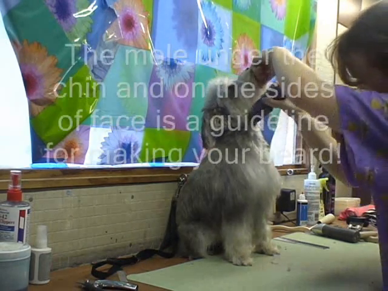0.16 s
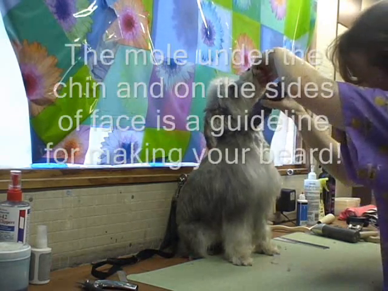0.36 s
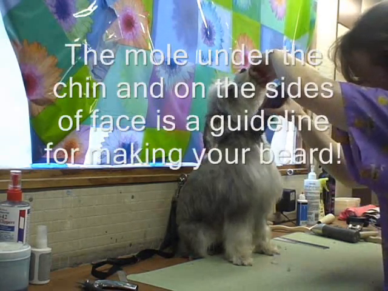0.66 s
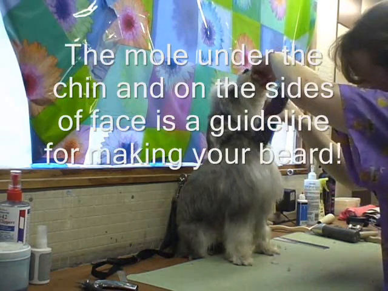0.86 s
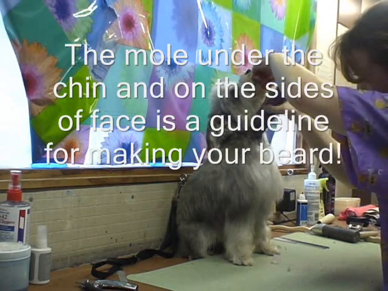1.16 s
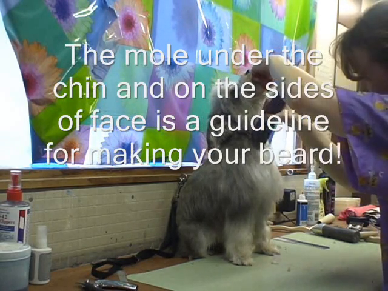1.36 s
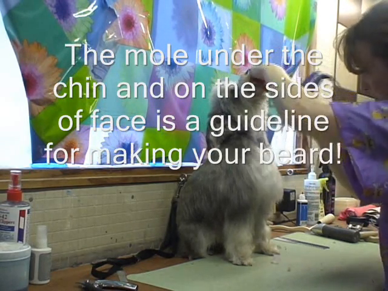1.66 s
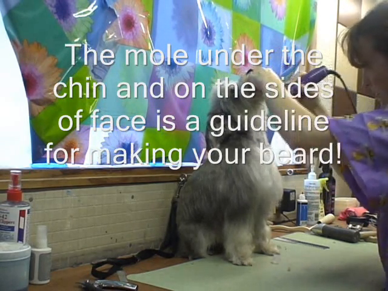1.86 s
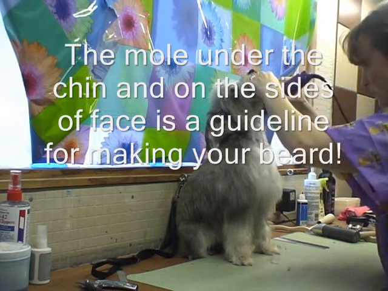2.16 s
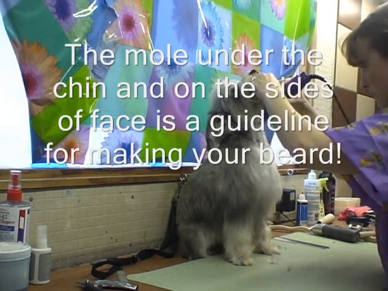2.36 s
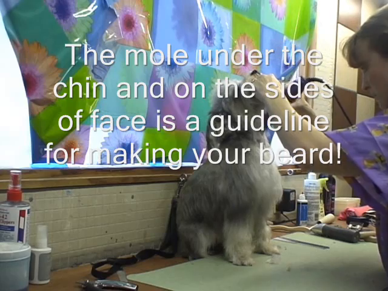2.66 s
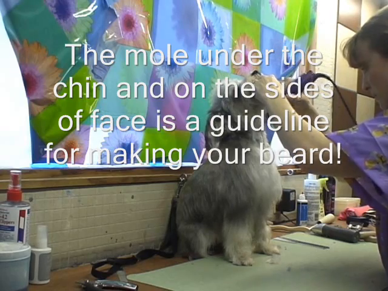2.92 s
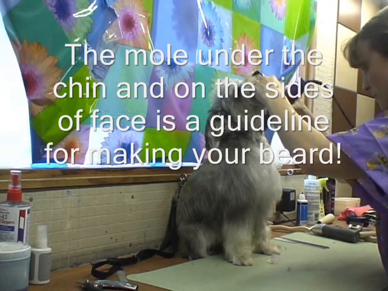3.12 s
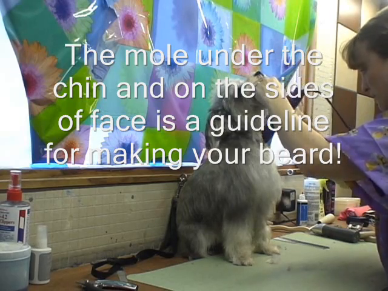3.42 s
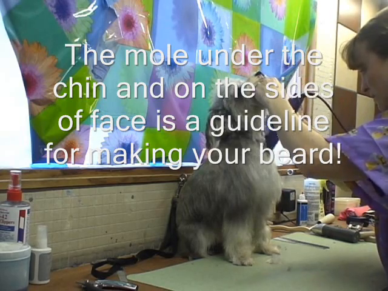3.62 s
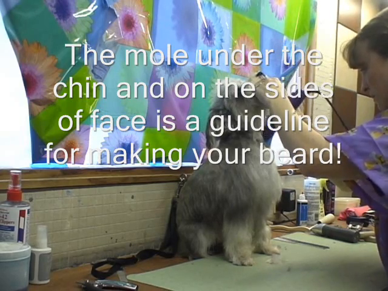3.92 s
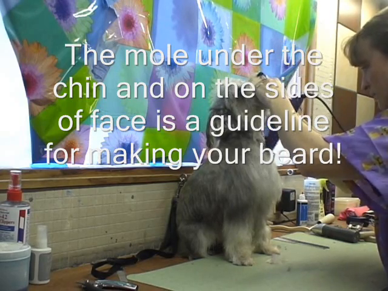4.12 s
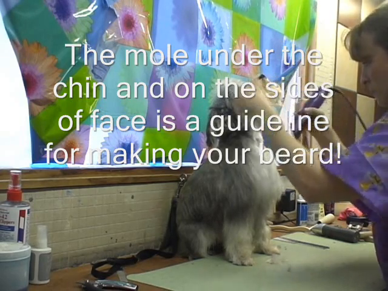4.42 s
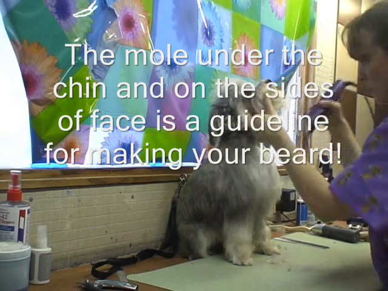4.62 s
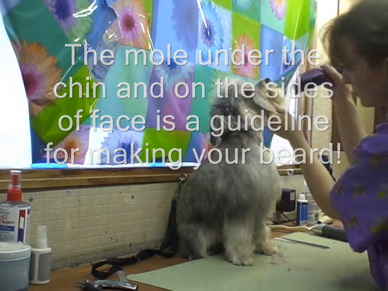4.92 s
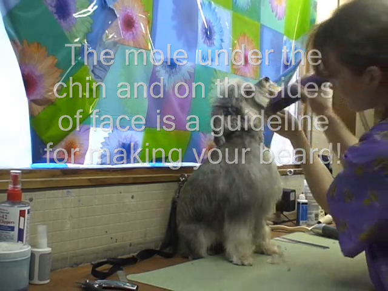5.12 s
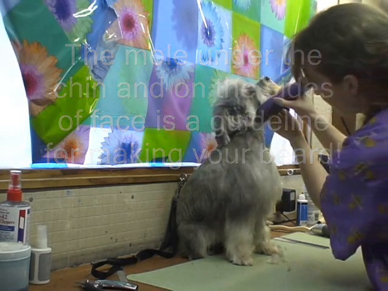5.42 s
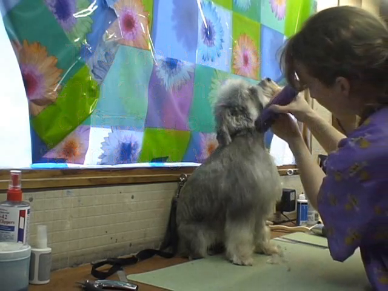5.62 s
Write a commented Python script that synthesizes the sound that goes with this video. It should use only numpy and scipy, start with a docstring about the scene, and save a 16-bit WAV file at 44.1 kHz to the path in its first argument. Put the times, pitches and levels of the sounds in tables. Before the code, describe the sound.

Electric clippers run without a break at a grooming table in a small room, trimming a dog's face. The motor buzz holds one pitch, with a bright hiss from the teeth and a light metallic blade rattle. The tone shifts as the tool turns, growing rougher when pressed into the fur past the middle. The clippers sit to the right of the microphone, over a faint room rumble.

```python
"""Electric clippers on a dog's face

Clippers work at a grooming table in a small room, a little to the right. The motor throws the blade
to and fro about 75 times a second; housing and blade ring at multiples of that rate, and their colour
shifts as the hand turns the tool. The teeth hiss, the blade rattles, low drones come and go,
the room rumbles faintly."""
import sys
import numpy as np
from scipy import signal
from scipy.fft import irfft, next_fast_len
from scipy.io import wavfile
from scipy.ndimage import uniform_filter1d, map_coordinates

SR = 44100
rng = np.random.default_rng(int(sys.argv[2]) if len(sys.argv) > 2 else 0)


def output_pcm(signal):
    """Save a mono or channel-first signal as 16-bit PCM at the path in sys.argv[1].

    Samples are clipped to [-1, 1] before scaling.
    """
    pcm = np.clip(np.atleast_2d(signal).T, -1, 1) * 32767
    wavfile.write(sys.argv[1], SR, np.round(pcm).astype(np.int16))


N = 254898

# motor speed, sagging under load (time [s], stroke rate [Hz])
MOTOR_SPEED = [(0.0, 75.5), (0.92, 75.5), (1.11, 75.2), (1.53, 75.4), (1.66, 75.2), (2.0, 75.5),
               (4.06, 75.6), (4.25, 75.7), (5.62, 75.6), (5.78, 75.3)]
# lower buzz lines (harmonic number, relative level [dB])
LOW_LINES = [(1, -28.5), (2, -30.5), (3, -23.5), (4, -34.5), (5, -19), (6, -19.5), (7, -16), (8, -15),
             (9, -16.5), (10, -10), (11, -17), (12, -9), (13, -16), (14, -11.5), (15, -12), (16, -13),
             (17, -13), (18, -5), (19, -10.5), (20, -5.5), (21, -11), (22, -8), (23, -5), (24, -11.5),
             (25, -2), (26, -4), (27, 6), (28, 2), (29, -3.5), (30, -6.5), (31, -5), (32, -8), (33, -14),
             (34, -8.5), (35, -7.5), (36, -17.5)]
# upper buzz lines (frequency [Hz], relative level [dB])
HIGH_LINES = [(2750, -9.5), (3200, -14.5), (4300, -14), (5500, -18), (7000, -20), (9000, -19.5)]
# bands of housing, front cap, blade, blade guide, teeth (lower edge [Hz])
BAND_EDGES_HZ = [1020, 1170, 1930, 2300, 3400]
# steel comb resonances (frequency [Hz], width [Hz], lift [dB])
COMB_RINGS = [(3320, 40, 3), (3625, 50, 2.5), (3850, 30, 3), (4002, 30, 5.5), (4230, 40, 2.5),
              (4455, 40, 3), (4530, 30, 2), (5060, 40, 3)]
# holds of the tool, each until the next (name, start [s], travel [standing-wave patterns/s],
# jaw pressure [0-1], blade chatter [factor], cap level [dB], guide level [dB], teeth level [dB])
TOOL_HOLDS = [("first cut", 0.0, 1.866, 0.59, 1.3, -32.5, -38.5, -34.5),
              ("deeper cut", 0.91, 1.914, 0.32, 1.1, -31.5, -37, -34),
              ("turning", 1.734, 3.58, 0.079, 1.8, -34, -37.5, -35),
              ("second cut", 2.093, 1.2, 0.53, 1.3, -35, -37, -35.5),
              ("pressing", 3.25, 1.58, 1, 2.9, -39.5, -37.5, -37.5),
              ("biting", 3.68, 2.1, 0.99, 3.3, -38, -35.5, -35),
              ("sliding", 3.98, 1.77, 1, 4.4, -39.5, -36, -35.5),
              ("lifted", 4.44, 3.3, .05, 0.98, -38, -38.5, -34),
              ("returning", 4.9, 2.46, .02, 2.8, -33.5, -35, -33.8),
              ("last cut", 5.27, 2.43, 0.063, 1.6, -32.5, -36, -34)]
# housing and comb resonances a hold frees or damps (hold name, frequency [Hz], unscaled lift [dB])
HOLD_RINGS = [("first cut", 680, 4), ("first cut", 830, -7), ("first cut", 906, 4), ("first cut", 1283, 4),
              ("first cut", 1700, 4), ("first cut", 2250, -4), ("first cut", 2600, -6),
              ("first cut", 3030, -6), ("first cut", 4455, 3), ("deeper cut", 455, 3),
              ("deeper cut", 755, 2), ("deeper cut", 906, 3), ("deeper cut", 1310, 4),
              ("deeper cut", 1700, 4), ("deeper cut", 1800, 4), ("deeper cut", 2600, -4),
              ("deeper cut", 2945, 4), ("turning", 528, 3), ("turning", 680, -6), ("turning", 1330, 4),
              ("turning", 1812, 4), ("turning", 2038, -5), ("turning", 3020, 5), ("second cut", 906, -2),
              ("second cut", 1480, 5.5), ("second cut", 1888, 2), ("second cut", 1963, -6),
              ("second cut", 2590, 6), ("second cut", 3020, 5), ("second cut", 3930, 4),
              ("pressing", 1490, 5), ("pressing", 2038, -5), ("pressing", 2645, 3), ("pressing", 4000, -4),
              ("biting", 830, 4), ("biting", 1490, 5), ("biting", 2038, -3), ("biting", 2340, 2),
              ("biting", 4000, -3), ("sliding", 790, 5), ("sliding", 1510, 3), ("sliding", 1888, -4),
              ("sliding", 2038, -5), ("sliding", 2190, 3), ("lifted", 604, 7), ("lifted", 680, -6),
              ("lifted", 830, 4), ("lifted", 1510, -3), ("lifted", 2340, -5), ("returning", 604, 7),
              ("returning", 680, -6), ("returning", 1359, 5), ("returning", 1888, 5),
              ("returning", 2114, -5), ("last cut", 830, 3), ("last cut", 1620, 3), ("last cut", 1888, 3),
              ("last cut", 2038, -4), ("last cut", 2190, 2), ("last cut", 2416, 4)]
# housing ring, tuned and damped by the fingers (time [s], level [dB], frequency [Hz])
HOUSING_RING = [(0, -42.5, 1095), (.25, -52, 1110), (.9, -47, 1085), (1.25, -51, 1090), (1.65, -47.5, 1072),
                (1.85, -39.3, 1090), (2.02, -39.6, 1103), (2.35, -44.8, 1095), (3.1, -45, 1098),
                (3.35, -41.5, 1078), (3.85, -41, 1057), (4.42, -39, 1060), (4.6, -39.5, 1116),
                (4.85, -38, 1115), (5.06, -35.5, 1093), (5.2, -37, 1100), (5.38, -38.2, 1132),
                (5.78, -39.3, 1128)]
# blade ring, swelling as the hand works (time [s], level [dB])
BLADE_RING_DB = [(0.0, -32.5), (0.3, -31), (0.42, -27.7), (0.54, -30.0), (0.58, -26.5), (0.8, -29),
                 (0.88, -28.5), (0.94, -31.5), (1.14, -30.5), (1.24, -28.5), (1.62, -32), (1.64, -33.8),
                 (1.82, -30), (1.98, -36), (2.2, -31.5), (2.33, -35), (2.87, -34), (3.05, -32.5),
                 (3.25, -34.5), (3.29, -35.5), (3.65, -35), (3.73, -31.5), (3.93, -30), (4.03, -34),
                 (4.27, -33.5), (4.31, -37), (4.37, -31), (4.81, -29), (4.85, -31), (4.97, -33),
                 (5.05, -36), (5.07, -32.3), (5.15, -38), (5.29, -32.5), (5.47, -35), (5.78, -33)]
# blade ring, rising as the comb pushes into fur (time [s], frequency [Hz])
BLADE_RING_HZ = [(0, 2013), (.55, 2045), (.82, 1996), (1.25, 2029), (1.8, 1972), (2.0, 2106), (2.22, 2019),
                 (3.1, 2010), (3.48, 2191), (3.72, 2092), (3.95, 2087), (4.1, 2210), (4.35, 2166),
                 (4.6, 2035), (5.0, 2013), (5.2, 2210), (5.45, 2065), (5.7, 2037)]
# partials flashing as comb or housing passes the mic (peak [s], length [s], frequency [Hz], level [dB])
LINE_FLARES = [(.06, .2, 2416, -39), (.27, .1, 5060, -44), (.5, .3, 4002, -44.5), (.95, .24, 4455, -40),
               (1.05, .13, 2340, -40), (1.2, .22, 1359, -39), (1.22, .12, 3625, -43), (1.28, .3, 4002, -41),
               (1.58, .16, 4380, -41), (1.62, .14, 4910, -44), (1.77, .16, 1888, -32.5),
               (1.85, .11, 4304, -38), (2.15, .2, 4002, -40.5), (2.26, .16, 3850, -40.5),
               (2.7, .2, 4455, -42.5), (2.72, .24, 4002, -40.5), (3.2, .25, 4002, -43),
               (3.3, .14, 4530, -44), (3.74, .1, 2114, -33), (3.58, .14, 5060, -41.5),
               (3.68, .3, 755, -43.5), (3.7, .07, 5060, -39), (3.85, .25, 906, -43), (4.02, .08, 2720, -41),
               (4.1, .12, 2190, -35.5), (4.12, .09, 5060, -39.5), (4.5, .1, 4002, -42),
               (4.68, .12, 4230, -39.5), (4.9, .14, 2645, -40), (4.97, .1, 2038, -31.5),
               (5.22, .13, 2645, -36.5), (5.44, .08, 3625, -41), (5.56, .42, 906, -39.5),
               (5.68, .1, 4002, -42), (5.73, .12, 2038, -31)]
# sliding teeth (frequency [Hz], relative density [dB])
HISS_SPECTRUM = [(100, -38), (330, -7), (600, -9), (1100, -1), (1600, -0.1), (2600, 0.9), (4200, 3),
                 (5500, 3.5), (7000, -2), (10000, -0.5), (12500, 1.5), (15700, -2)]
# dull low drones (peak [s], length [s], frequency [Hz], level [dB])
LOW_DRONES = [(3.27, 0.25, 240, -48), (3.683, .27, 232, -52), (4.113, .11, 225, -47),
              (4.33, 0.13, 230, -50), (5.45, 0.67, 135, -55)]
# room rumble (frequency [Hz], relative density [dB])
RUMBLE_SPECTRUM = [(20, -25), (35, -2), (60, -6.5), (95, 0.5), (140, -4), (190, -5), (300, -6), (600, -6),
                   (2000, -77)]
# stereo balance (frequency [Hz], left minus right [dB])
MIC_BALANCE_DB = [(60, -12), (210, -13), (500, -7), (1170, -10), (1790, -6), (2740, -8.5), (4190, -7.5),
                  (6410, -4), (9810, -1.5), (15000, 0)]
# left-right likeness (frequency [Hz], coherence [0-1])
MIC_COHERENCE = [(60, 0.57), (250, 0.42), (600, 0.87), (2000, 0.57), (4000, 0.43), (9000, 0.36),
                 (15000, 0.16)]
# lead of the left mic (frequency [Hz], phase [rad])
MIC_LEAD_RAD = [(60, .1), (340, 0.78), (1200, 1), (5000, 0.8), (12000, 0.91)]

HUM_GAIN_DB, LINES_TOP_HZ = -36.5, 10000
TURN_S, TURN_SWELL_S, TURN_DB = .076, .3, .5  # change of hold
GRIP_DB, GRIP_S = 1.7, .13  # fingers shift on the housing
FUR_DB, FUR_S = 1.0, .09  # fur feeds unevenly through the teeth


def buzz(strokes, t, size=4096):
    """Motor-driven blade: one wave per stroke, each blending into the next."""
    stroke_t = np.interp(np.arange(int(strokes[-1]) + 1), strokes, t)
    lines = np.pad(stroke_lines(stroke_t), ((0, 0), (0, 0), (1, 0)))  # empty DC bin
    waves = irfft(lines, size) * size / np.sqrt(2)
    waves = np.concatenate([waves, waves[:, :, :1]], axis=2)
    position = [strokes, strokes % 1 * size]
    return np.array([map_coordinates(wave, position, order=1, mode="nearest") for wave in waves])


def stroke_lines(t, count=190, knock_db=.6, jitter_s=7e-6):
    """Complex harmonics of the stroke rate: channels x strokes x lines."""
    order = np.arange(1, count + 1)
    hz = order * np.mean(np.array(MOTOR_SPEED)[:, 1])
    part = np.searchsorted(BAND_EDGES_HZ, hz)  # 0 motor hum, 1 housing ... 5 teeth
    pace, _, chatter, *_ = hand(t)
    travel = np.cumsum(pace * np.gradient(t))
    low_db = np.interp(order, *np.transpose(LOW_LINES))
    db = np.where(order <= len(LOW_LINES), low_db, at_hz(HIGH_LINES, hz))
    db += sum(lift_db * bell(hz, ring_hz, width_hz) for ring_hz, width_hz, lift_db in COMB_RINGS)
    db -= 10 * np.log10(1 + (hz / LINES_TOP_HZ) ** 8)
    db = db + hold_colour_db(t, hz, part) + treble_beam_db(travel, hz)
    lines = from_db(db) * fading(travel, chatter, hz) * line_phases(hz)
    lines = flares(radiating_parts(lines, t, part), t, hz)
    # the loose blade lands harder or softer, earlier or later, each stroke
    force, late = rng.standard_normal((2, len(t), 1))
    lines *= from_db(knock_db * force * (part > 1))
    lines *= np.exp(-2j * np.pi * hz * jitter_s * late)
    return stereo_lines(lines, travel, hz)


def hold_colour_db(t, hz, part, press_db=7, ring_scale=1.26):
    """Jaw pressure fills the low mids; blade and housing rings slide; holds free or damp resonances."""
    _, pressure, *_ = hand(t)
    db = press_db * (pressure[:, None] - .4) * bell(hz, 360, 90)
    blade = bell(hz, in_time(BLADE_RING_HZ, t)[0][:, None], 150)
    db += 8 * (blade - blade.mean(axis=0))
    housing = bell(hz, in_time(HOUSING_RING, t)[1][:, None], 60)
    db += 10 * np.log10(housing) * (part == 1)
    held = {hold[0]: share - share.mean() for hold, share in zip(TOOL_HOLDS, hold_shares(t))}
    for name, ring_hz, lift_db in HOLD_RINGS:
        db += ring_scale * lift_db * held[name][:, None] * bell(hz, ring_hz, 30 + .024 * ring_hz)
    return db


def treble_beam_db(travel, hz, swing_db=1.9):
    """Uneven treble beam: neighbouring lines swell together as the tool turns."""
    lobes = rms_one(uniform_filter1d(standing_waves(3.5 * travel, len(hz)).real, size=3, axis=1))
    return swing_db * lobes * (hz > BAND_EDGES_HZ[-1]) * bell(hz, 4400, 2200)


def fading(travel, chatter, hz, flutter=.19, rough=.06):
    """Hand tremor, stroke scatter and wall echoes vary each line, short waves most."""
    shape = len(travel), len(hz)
    tremor = rms_one(signal.fftconvolve(phasors(*shape), np.hanning(15)[:, None], "same"))
    looseness = 1 + (chatter[:, None] - 1) * bell(hz, 2000, 300)
    unsteady = looseness * np.clip(hz / 2000, .55, 1.3) * (flutter * tremor + rough * phasors(*shape))
    slow, fast = standing_waves(travel, len(hz)), standing_waves(3 * travel, len(hz))
    echoes = np.where(hz < BAND_EDGES_HZ[-1], slow, fast)
    echo_gain = np.interp(hz, [900, 3800], [.26, .68])
    return (1 + echo_gain * echoes + unsteady) / np.hypot(1, echo_gain)


def line_phases(hz, focus=.66):
    """The room scatters phase, least near the blade ring: one burst a stroke, after the cap's knock."""
    scatter_rad = np.pi * (1 - focus * bell(hz, 1990, 720) ** 2)
    lag_rad = 2 * np.arctan(2 * (hz - 2030) / 300)
    return np.exp(1j * (scatter_rad * rng.uniform(-.74, 1, len(hz)) - lag_rad))


def radiating_parts(lines, t, part, trims_db=(0, -.1, -.5, -.3, -.3)):
    """Each part radiates as the grip allows; the motor hum below stays free."""
    *_, cap_db, guide_db, _ = hand(t)
    housing_db = in_time(HOUSING_RING, t)[0] + GRIP_DB * wander(t, GRIP_S)
    cap_db = cap_db + FUR_DB * wander(t, FUR_S)
    blade_db, = in_time(BLADE_RING_DB, t)
    guide_db = guide_db + FUR_DB * wander(t, FUR_S)
    teeth_db = teeth_level_db(t) + FUR_DB * wander(t, FUR_S)
    out = lines.copy()
    out[:, part == 0] *= from_db(HUM_GAIN_DB)
    for k, (db, trim_db) in enumerate(zip([housing_db, cap_db, blade_db, guide_db, teeth_db], trims_db), 1):
        power = uniform_filter1d(np.sum(np.abs(lines[:, part == k]) ** 2, axis=1), size=9)
        out[:, part == k] *= (from_db(db + trim_db) / np.sqrt(power))[:, None]
    return out


def flares(lines, t, hz):
    """Each flare draws the nearest line to its own level, then lets go."""
    out = lines.copy()
    for peak_s, length_s, flare_hz, db in LINE_FLARES:
        k = np.argmin(np.abs(hz - flare_hz))
        phase_rad = np.angle(out[np.argmin(np.abs(t - peak_s)), k])
        out[:, k] += swell(t, peak_s, length_s) * (from_db(db) * np.exp(1j * phase_rad) - out[:, k])
    return out


def stereo_lines(mid, travel, hz):
    """Direct sound from the right, wall echoes from all round."""
    left_over_right = from_db(at_hz(MIC_BALANCE_DB, hz)) * np.exp(1j * at_hz(MIC_LEAD_RAD, hz))
    direct = (left_over_right - 1) / (left_over_right + 1)
    diffuse = 1.01 * (1 - at_hz(MIC_COHERENCE, hz)) * standing_waves(2 * travel, len(hz))
    side = mid * (direct + diffuse)
    return np.array([mid + side, mid - side])


def teeth_hiss(strokes, t, base_db=-33, follow=.27):
    """Teeth slide over each other and tick once a stroke, at the turn."""
    teeth_db = teeth_level_db(t) - 1.5 * wander(t, FUR_S)
    swell_db = follow * (teeth_db - teeth_db.mean())
    ticks = 1 + .54 * np.exp(-((strokes + .5) % 1) / .15)
    return from_db(base_db + swell_db) * ticks * noise(lambda hz: from_db(at_hz(HISS_SPECTRUM, hz)))


def teeth_level_db(t):
    """Set by the hold; swells at each turn of the hand."""
    *_, held_db = hand(t)
    lift_db = TURN_DB * sum(swell(t, hold[1], TURN_SWELL_S) for hold in TOOL_HOLDS[1:])
    return held_db + lift_db - lift_db.mean()


def blade_rattle(strokes, t, gain_db=-11, throb_db=5):
    """The blade knocks in its guide once a stroke and rings at its own pitch."""
    blade_db, = in_time(BLADE_RING_DB, t)
    blade_hz, = in_time(BLADE_RING_HZ, t)
    knock = rms_one(from_db(throb_db * np.cos(2 * np.pi * strokes)))
    ring = signal.hilbert(noise(lambda hz: bell(hz, 2050, 240)), next_fast_len(N))[:, :N]
    bend = np.exp(2j * np.pi * np.cumsum(blade_hz - blade_hz.mean()) / SR)
    return from_db(blade_db + gain_db) * knock * np.real(ring * bend)


def hand(t):
    """Travel rate, pressure, chatter, and cap, guide and teeth levels at times t."""
    return np.array([hold[2:] for hold in TOOL_HOLDS]).T @ hold_shares(t)


def hold_shares(t):
    """Weights 0-1, crossfaded as the hand turns: holds x times."""
    begun = [np.clip((t - hold[1]) / TURN_S + .5, 0, 1) for hold in TOOL_HOLDS[1:]]
    return -np.diff([np.ones_like(t), *begun, np.zeros_like(t)], axis=0)


def standing_waves(travel, count):
    """Each line meets its own sum of wall echoes, changing as the tool travels."""
    spots = np.arange(-2, travel[-1] + 2, .5)
    weights = np.exp(-2 * (travel[:, None] - spots) ** 2)
    weights /= np.linalg.norm(weights, axis=1, keepdims=True)
    return weights @ phasors(160, count)[:len(spots)]


def near_echoes(x, t, delays_s=(.0011, .0026), gain=.24, sway=.12):
    """Dull early echoes off table and wall; their paths move with the hand."""
    pace, *_ = hand(t)
    travel = np.cumsum(pace) / SR
    dull = signal.sosfilt(signal.butter(4, 5000, fs=SR, output="sos"), x)
    out = x.copy()
    for delay_s in delays_s:
        lag_s = delay_s * (1 + sway * np.sin(2 * travel + 2 * np.pi * rng.random()))
        out += gain * np.array([map_coordinates(channel, [(t - lag_s) * SR], order=3) for channel in dull])
    return out


def drones(t, width_hz=32):
    """Narrow, unsteady low resonances that swell and sink."""
    return sum(from_db(db) * swell(t, peak_s, length_s) * noise(lambda hz: bell(hz, drone_hz, width_hz))
               for peak_s, length_s, drone_hz, db in LOW_DRONES)


def room_rumble(level_db=-52):
    """Steady low noise of the room."""
    return from_db(level_db) * noise(lambda hz: from_db(at_hz(RUMBLE_SPECTRUM, hz)))


def noise(colour):
    """Stereo noise with gain colour(hz); unit power in the mid."""
    size = next_fast_len(N)
    hz = np.arange(size // 2 + 1) * SR / size
    pair = irfft(microphones(*phasors(2, len(hz)), hz) * colour(hz), size)[:, :N]
    return pair / np.std(pair.mean(axis=0))


def microphones(common, opposed, hz):
    """Left and right spectra from a common and an opposed field; the mid stays flat."""
    coherence, lead_rad = at_hz(MIC_COHERENCE, hz), at_hz(MIC_LEAD_RAD, hz)
    tilt = from_db(at_hz(MIC_BALANCE_DB, hz) / 2)
    common, opposed = np.sqrt(1 + coherence) * common, np.sqrt(1 - coherence) * opposed
    mid_gain = np.sqrt((tilt ** 2 + tilt ** -2) / 2 + coherence * np.cos(lead_rad))
    return np.array([(common + opposed) * tilt * np.exp(1j * lead_rad), (common - opposed) / tilt]) / mid_gain


def from_db(db):
    """Decibels to gain."""
    return 10 ** (np.asarray(db) / 20)


def rms_one(x):
    """Scale to unit power."""
    return x / np.sqrt(np.mean(np.abs(x) ** 2) + 1e-20)


def in_time(rows, t):
    """Table columns at times t."""
    times_s, *columns = np.transpose(rows)
    return [np.interp(t, times_s, column) for column in columns]


def at_hz(points, hz):
    """Table value on a log-frequency axis."""
    points_hz, values = np.transpose(points)
    return np.interp(np.log(np.maximum(hz, 1)), np.log(points_hz), values)


def bell(hz, centre_hz, width_hz):
    """Power response of a resonance, peak 1."""
    return 1 / (1 + (2 * (hz - centre_hz) / width_hz) ** 2)


def phasors(*shape):
    """Random complex amplitudes of unit power."""
    return (rng.standard_normal(shape) + 1j * rng.standard_normal(shape)) / np.sqrt(2)


def swell(t, peak_s, length_s):
    """Gaussian bump, length_s wide at half height."""
    return .5 ** ((2 * (t - peak_s) / length_s) ** 2)


def wander(t, step_s, count=600):
    """Random curve of about unit swing, new value every step_s."""
    return np.interp(t / step_s, np.arange(count), rng.standard_normal(count))


def scene(wobble_hz=.0392):
    """Clippers at work over drones and room rumble."""
    t = np.arange(N) / SR
    motor_hz, = in_time(MOTOR_SPEED, t)
    wobble = rms_one(uniform_filter1d(rng.standard_normal(N), size=2500))
    strokes = np.cumsum(motor_hz + wobble_hz * wobble) / SR
    room = room_rumble()
    teeth = near_echoes(teeth_hiss(strokes, t), t)
    return buzz(strokes, t) + blade_rattle(strokes, t) + teeth + drones(t) + room


def record(dry, left_shelf_hz=11400, left_shelf_db=-14, cutoff_hz=15850):
    """Treble shelf on the left, steep low-pass on both channels."""
    dull = signal.sosfiltfilt(signal.butter(16, left_shelf_hz, fs=SR, output="sos"), dry[0])
    left = dull + from_db(left_shelf_db) * (dry[0] - dull)
    return signal.sosfilt(signal.ellip(12, .1, 90, cutoff_hz, fs=SR, output="sos"), [left, dry[1]])


dry = scene()
out = record(dry)
output_pcm(out)
```